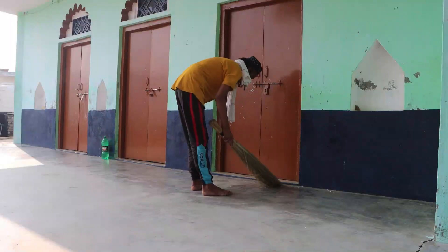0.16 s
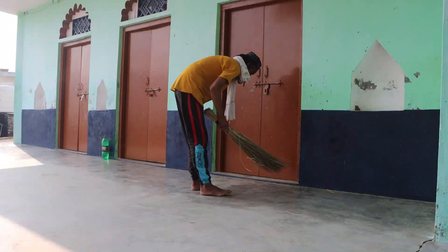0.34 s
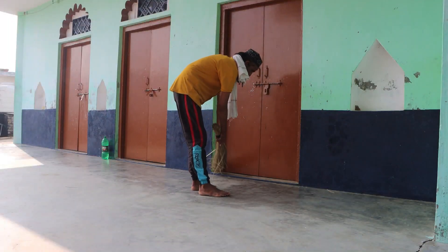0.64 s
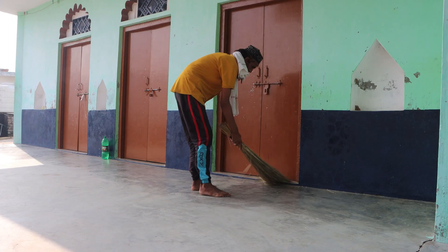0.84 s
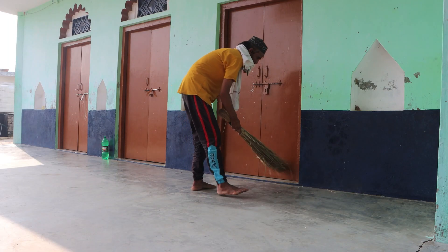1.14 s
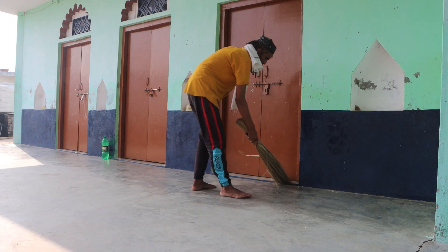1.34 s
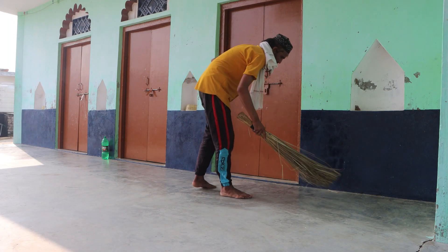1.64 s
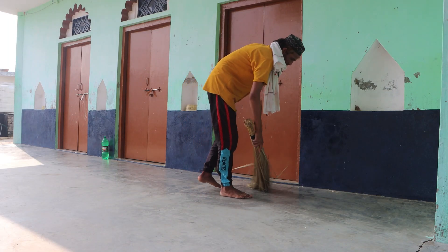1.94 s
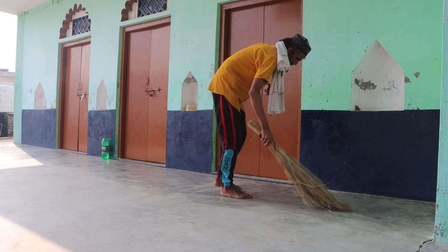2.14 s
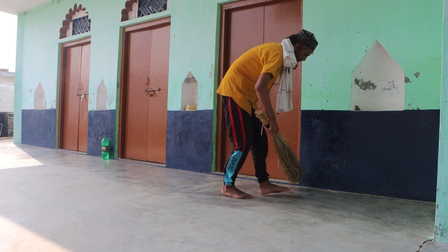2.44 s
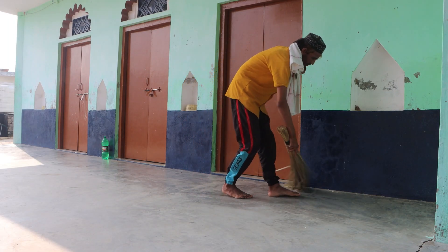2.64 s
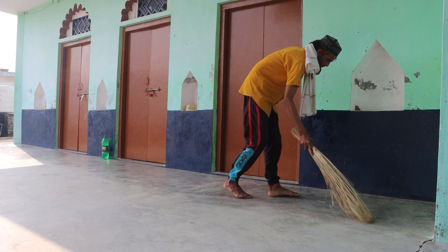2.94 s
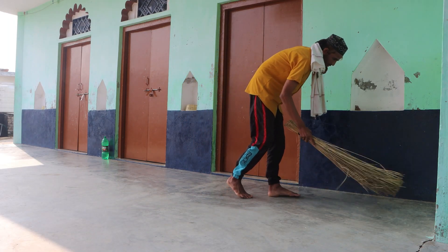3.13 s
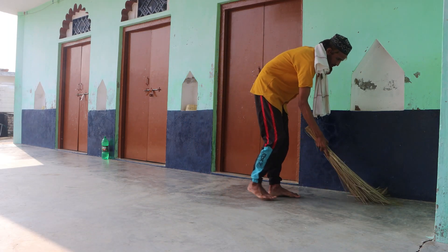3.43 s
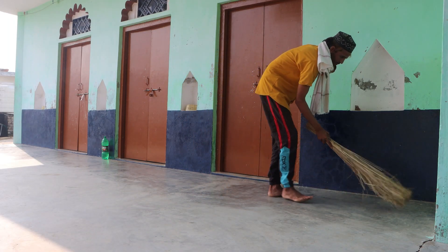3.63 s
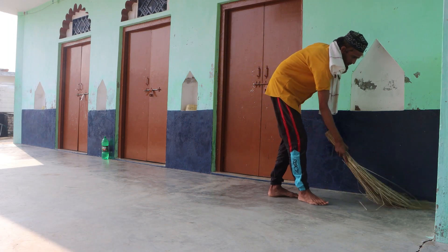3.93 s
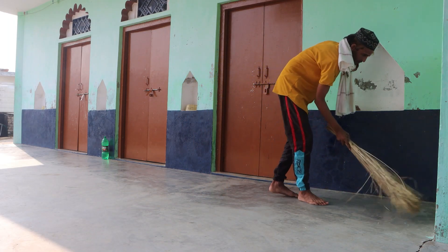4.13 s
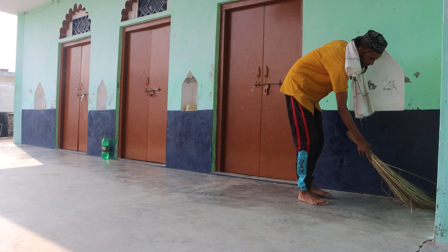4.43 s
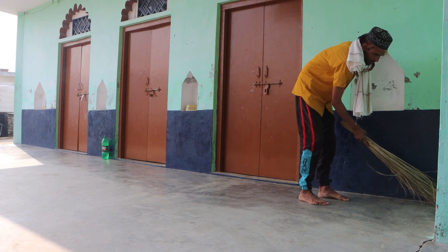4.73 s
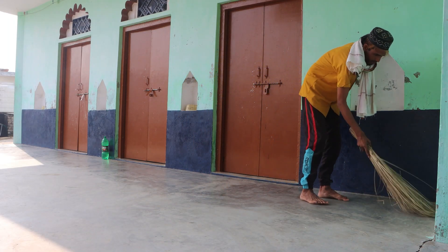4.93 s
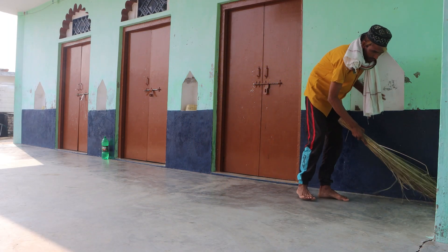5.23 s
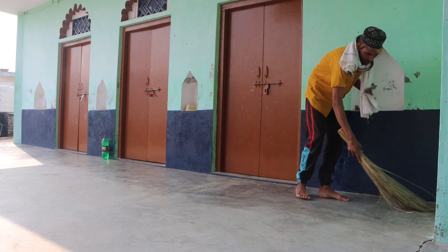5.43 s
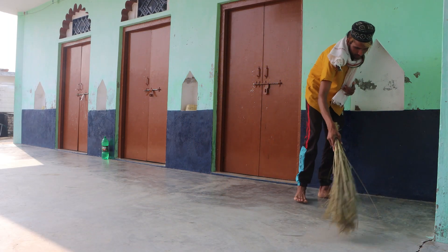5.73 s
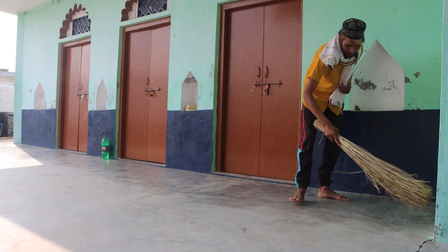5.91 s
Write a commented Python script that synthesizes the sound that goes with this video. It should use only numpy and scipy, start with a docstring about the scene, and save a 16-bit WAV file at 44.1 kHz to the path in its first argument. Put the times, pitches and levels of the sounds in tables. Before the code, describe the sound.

Outdoors under a roof, dry stalks swish rhythmically over hard floor, roughly every half to three-quarters of a second. Forward strokes are sharp, crackly and high; return drags are light and quiet. Isolated clicks spring from bent stalks, with a brief rough chatter or two. Faint barefoot puffs come early on. Low traffic noise and a wavering far engine, slowly drawing nearer, lie underneath. Single camera microphone, same in both channels.

```python
"""Distant traffic and a far engine, filtered noise and two wavering tones, drone under the whole scene.
A long straw broom sweeps a smooth concrete veranda in ten brisk strokes, dragging lightly on the way back:
random slips of thousands of stalk tips ring the straw and scrape grit, and wall and roof answer briefly.
Bare feet pad along as dull noise puffs; throughout, stray stalks flick as short resonances. A few chatter
as rough tones, and later strokes begin with the bundle slapping down. One microphone."""
import sys
import numpy as np
from scipy import signal
from scipy.fft import rfft, irfft, next_fast_len
from scipy.io import wavfile
from scipy.ndimage import map_coordinates

SR = 44100
rng = np.random.default_rng(int(sys.argv[2]) if len(sys.argv) > 2 else 0)


def digitize_waveform(pressure):
    """Quantize a signal to 16-bit integers and store it at the path in sys.argv[1].

    Rows of a 2-D input are taken as channels; values are limited to [-1, 1].
    """
    field = np.atleast_2d(pressure).T
    bounded = np.clip(field, -1, 1)
    quanta = np.round(bounded * 32767).astype(np.int16)
    wavfile.write(sys.argv[1], SR, quanta)


N = 267673  # samples


def amp(db):
    """Decibels to gain."""
    return 10 ** (np.asarray(db) / 20)


def unit(x):
    """Scale to rms 1."""
    return x / np.sqrt(np.mean(x ** 2) + 1e-20)


def along(points, hz):
    """Read (Hz, value) points on a log frequency axis."""
    f, v = np.transpose(points)
    return np.interp(np.log(hz + 1), np.log(f + 1), v)


def curves(rows):
    """One value per sample for each column after the time."""
    s, *cols = np.transpose(rows)
    return [np.interp(np.arange(N) / SR, s, c) for c in cols]


def wobble(rate):
    """A smooth random curve with rate knots a second."""
    knots = rng.standard_normal(int(N * rate / SR) + 4)
    return map_coordinates(knots, [np.arange(N) * rate / SR])


def colour(x, spectrum, size=2048):
    """Minimum-phase filter with the given spectrum, so that clicks keep sharp fronts; rms 1."""
    gain = amp(along(spectrum, np.fft.rfftfreq(size, 1 / SR)))
    cepstrum = irfft(np.log(gain))
    # fold the cepstrum forwards in time: the filter becomes causal
    cepstrum[1:size // 2] *= 2
    cepstrum[size // 2 + 1:] = 0
    response = irfft(np.exp(rfft(cepstrum)))
    return unit(signal.fftconvolve(x, response)[:N])


def noise(spectrum):
    """Steady noise with the given spectrum; rms 1."""
    m = next_fast_len(N)
    gain = amp(along(spectrum, np.fft.rfftfreq(m, 1 / SR)))
    return unit(irfft(rfft(rng.standard_normal(m)) * gain, m)[:N])


def resonate(x, hz, q):
    """One resonance."""
    return signal.lfilter(*signal.iirpeak(hz, max(q, .5), SR), x)


def add(track, s, sound):
    """Mix a sound into a track at time s in seconds."""
    part = track[max(round(s * SR), 0):][:len(sound)]
    part += sound[:len(part)]


def burst(length, db, grain):
    """A grainy sound swells to level db over a quarter of length in seconds, then fades more slowly."""
    u = 4 * np.arange(len(grain)) / SR / length
    swell = u * np.exp(1 - u)
    grain_rms = np.sqrt(np.average(grain ** 2, weights=swell ** 2))
    return amp(db) * grain * swell / grain_rms


# Distant traffic. Each row: time in seconds, rumble level in dB.
TRAFFIC_LEVEL = [(0, -39), (.6, -34.5), (1.1, -39.5), (1.4, -35.5), (2.3, -40), (3.4, -36.5), (3.7, -44.5),
                 (4, -40.5), (5.2, -37), (5.95, -32.5)]
# Colour of the rumble. Each row: frequency in Hz, relative level per Hz in dB.
RUMBLE_COLOUR = [(15, -13), (30, -7), (39, -2.5), (46, 2.5), (54, -2), (70, -11.5), (100, -14.5),
                 (160, -21), (400, -42)]
# The low and the high tone of a far engine, in Hz.
ENGINE_TONES = [174, 355]
# The engine draws nearer. Each row: time in seconds, low tone in dB, high tone in dB, before the waver.
ENGINE_LEVELS = [(0, -73, -61), (2.7, -63.5, -57), (4.1, -55, -54), (4.7, -54.5, -72), (6.07, -50, -54)]
# Colour of the open air. Each row: frequency in Hz, relative level per Hz in dB.
AIR_COLOUR = [(40, -4), (110, -3), (190, 2.5), (300, -5), (600, -2), (1000, -9), (2000, -7.5), (8000, -34),
              (15000, -35)]
AIR_DB, AIR_SWING_DB = -44.5, 1.2  # middle level; scale of its random swing


def outdoors():
    """Traffic rumble and open air are coloured noise; a far engine is two tones that waver together in pitch."""
    rumble_db, = curves(TRAFFIC_LEVEL)
    rumble = amp(rumble_db) * noise(RUMBLE_COLOUR)
    turning = np.cumsum(1 + 0.0079 * wobble(3)) / SR
    engine = np.zeros(N)
    for hz, db in zip(ENGINE_TONES, curves(ENGINE_LEVELS)):
        level = amp(db + 1.14 * wobble(6.1))
        engine += level * np.sqrt(2) * np.sin(2 * np.pi * hz * turning)
    air = amp(AIR_DB + AIR_SWING_DB * wobble(4.05)) * noise(AIR_COLOUR)
    return rumble + engine + air


def slips(rate, spread_db, smooth):
    """Random tiny slips of uneven size, rate a second, over smooth sliding friction."""
    sizes = np.minimum(rng.standard_normal(N), 2.5)
    signs = np.sign(rng.standard_normal(N))
    kicks = (rng.random(N) < rate / SR) * signs * amp(spread_db * sizes)
    return unit(kicks) + smooth * rng.standard_normal(N)


def straw_ring(x, hz, q, count=5):
    """A gliding straw resonance, cross-faded between fixed ones."""
    steps = np.linspace(hz.min(), hz.max(), count)
    ring = np.zeros(N)
    for step, share in zip(steps, np.eye(count)):
        ring += np.interp(hz, steps, share) * resonate(x, step, q)
    return ring


# Colours of the straw, thick stems, fine tips, floor scrape and rasping stalk points.
# In all five, each row: frequency in Hz, relative level per Hz in dB.
STRAW_COLOUR = [(2000, -17), (5500, -18.5), (7000, 0.5), (10000, 0.5), (12000, -13.5), (15500, -19)]
STEM_COLOUR = [(2500, -39.5), (4300, -10.5), (5400, -3.5), (6500, 0), (7500, -3), (9500, -25), (15000, -50)]
TIP_COLOUR = [(6000, -28.5), (9500, -8), (10800, -2.5), (12500, -3), (13400, -6.5), (14400, -10),
              (15100, -16), (15800, -5.5)]
SCRAPE_COLOUR = [(90, -35), (220, -7.5), (520, -3), (800, -2), (1200, -1.5), (1700, 3), (2300, -0.5),
                 (3000, -5.5), (4500, -21), (15000, -39)]
POINT_COLOUR = [(1500, -21), (2400, -4), (2900, -1.5), (3800, -0.5), (4600, -4), (6000, -7.5), (15000, -40)]


def broom():
    """Stalk tips catch and slip in clumps; the slips ring straw, stems and tips, and grind on the floor."""
    rub_db, scrape_db, rasp_db, stem_db, tip_db, pitch = contact()
    # a louder rub is a faster stroke: more slips a second
    rate = 9000 * amp(.6 * (rub_db + 18.5))
    # neighbouring stalks let go together
    clumps = unit(amp(0.64 * wobble(520) + 0.99 * wobble(80)))

    def catch(share=1):
        """Clumped slips at a share of the stalk rate."""
        return slips(share * rate, spread_db=3, smooth=0.54) * clumps

    straw = colour(straw_ring(catch(), pitch, q=4.94), STRAW_COLOUR)
    stems = colour(catch(), STEM_COLOUR)
    tips = colour(catch(), TIP_COLOUR)
    # grains of grit are fewer than stalks
    scrape = colour(catch(.45), SCRAPE_COLOUR)
    rasp = colour(catch(.45), POINT_COLOUR)
    grit = scrape + amp(rasp_db + 1) * rasp
    stalks = amp(-0.6) * straw + amp(stem_db) * stems + amp(tip_db + 1.5) * tips
    return amp(rub_db) * (stalks + amp(scrape_db - 0.32) * grit)


# Trailing stalks never quite leave the floor. The one row: rub in dB, scrape against rub in dB,
# rasp against scrape in dB, stems against rub in dB, tips against rub in dB, straw pitch in Hz.
TRAILING_STALKS = (-34, -6, -1.5, -5, -2.5, 8400)


def contact():
    """Rub, scrape, rasp, stems, tips and pitch over time: contacts add in power, the strongest rules the colour."""
    t = np.arange(N) / SR
    trailing = (TRAILING_STALKS[0], TRAILING_STALKS[1:])
    power, blend = 0, 0
    for db, tone in [*strokes(t), *drags(t), trailing]:
        weight = amp(np.maximum(db, -120)) ** 2
        power = power + weight
        blend = blend + weight * np.reshape(tone, (len(tone), -1))
    scrape_db, rasp_db, stem_db, tip_db, pitch = blend / power
    more_rub, more_scrape, more_stems, more_tips = pushes(t)
    rub_db = 10 * np.log10(power) + more_rub
    return rub_db, scrape_db + more_scrape, rasp_db, stem_db + more_stems, tip_db + more_tips, pitch


# Decay of the veranda's answer. Each row: frequency in Hz, time to fall by 60 dB in seconds.
VERANDA_DECAY = [(200, 0.64), (2000, 0.51), (8000, 0.7), (15000, 0.59)]


def veranda(x, count=48):
    """Wall, floor and roof return a short noise tail, cross-faded to a new one as the broom moves about."""
    out, places = np.zeros(N), np.linspace(0, N, count)
    for share in np.eye(count):
        hz, t, z = signal.stft(rng.standard_normal(SR // 2), SR, nperseg=256)
        decay = amp(-60 * t / along(VERANDA_DECAY, hz)[:, None])
        tail = signal.istft(z * decay, SR, nperseg=256)[1]
        here = np.sqrt(np.interp(np.arange(N), places, share))
        echo = signal.fftconvolve((x * here)[here > 0], tail / np.linalg.norm(tail))
        add(out, np.argmax(here > 0) / SR + .005, echo)  # 5 ms late
    return out


# Forward strokes. Each row: start in seconds, attack in seconds, hold in seconds, fade in seconds, rub in dB,
# loss over the fade in dB, tips' gain over the stroke in dB, pitch glide over the stroke in Hz,
# floor scrape against rub in dB, rasp against scrape in dB, thick stems against rub in dB,
# fine tips against rub in dB, straw pitch in Hz. The roll below shifts the last five.
FORWARD_STROKES = [(0.021, 0.056, 0.063, 0.26, -18.5, 8, -10, -500, -14, -1, -1.5, -4, 8400),
                   (0.824, 0.08, 0.15, 0.076, -18.5, 7, -12, 0, -13, -2, -2.5, -3.5, 8200),
                   (1.449, 0.095, .015, .15, -15.5, 10, 2, 200, -12.5, -3, -7, -6.5, 8450),
                   (2.039, 0.067, .06, 0.21, -17, 8, 1, -2, -16, 1.5, -14, -4, 9000),
                   (2.706, 0.086, .1, 0.24, -16, 9, -2, 300, -16, 1, -11.5, -5.5, 8830),
                   (3.372, 0.042, 0.1, 0.3, -15.5, 8.5, 0, -300, -14.5, -3, -10.5, -9, 8560),
                   (3.921, 0.035, 0.094, 0.19, -18, 8, 6, 600, -14, -1, -10.5, -7.5, 8860),
                   (4.46, 0.025, .11, 0.15, -17, 5.5, 0, 202, -16, 0.5, -13.5, -5, 8900),
                   (4.896, 0.048, 0.12, 0.13, -17.5, 6, 6, 400, -15.5, 1, -11, -7, 8700),
                   (5.399, 0.032, 0.23, 0.16, -22, 3.5, 3, 600, -13.5, -2.5, -6, -4, 8300)]
# Through a stroke the bundle rolls from lying flat up onto its points. Each row: share of the stroke from 0 to 1,
# then the shifts of scrape in dB, rasp in dB, stems in dB, tips in dB and straw pitch in Hz.
BUNDLE_ROLL = [(0, 5, -2, 4, 1.5, -350), (.25, 0.5, 0, 1, -0.5, -150), (.55, -1.5, 1, -2.5, 0.5, 150),
               (1, 4.5, 1.5, -0.5, 2.5, 200)]
TOUCH_DB, LIFT_DB_PER_S = -13, 170  # first touch against full rub; fall as the broom lifts


def strokes(t):
    """Each stroke bites, holds, fades and lifts, while the roll of the bundle shifts its colour."""
    share, *shifts = np.transpose(BUNDLE_ROLL)
    for s, attack, hold, fade, db, loss_db, tip_gain_db, glide_hz, *tone in FORWARD_STROKES:
        length = attack + hold + fade
        bite = TOUCH_DB * np.maximum(1 - (t - s) / attack, 0)
        ease = loss_db * np.clip((t - s - attack - hold) / fade, 0, 1)
        lift = LIFT_DB_PER_S * np.maximum(t - s - length, 0)
        done = np.clip((t - s) / length, 0, 1)
        rolled = [own + np.interp(done, share, shift) for own, shift in zip(tone, shifts)]
        scrape, rasp, stems, tips, pitch = rolled
        tips = tips + tip_gain_db * (done - .5)
        pitch = pitch + glide_hz * (done - .5)
        yield db + bite - ease - lift, [scrape, rasp, stems, tips, pitch]


# Soft blows of bare feet. Each row: start in seconds, relative level in dB, pitch in Hz, length in seconds.
FOOT_PADS = [(.1, -35, 210, .097), (0.447, -38, 295, 0.087), (1.324, -34, 250, .13), (1.353, -33, 42, 0.14),
             (1.743, -32.5, 324, 0.073), (1.849, -35, 280, .15), (2.743, -25, 48, 0.057)]


def pads():
    """Bare soles give a dull puff: noise through two broad resonances, with no ring."""
    out = np.zeros(N)
    for s, db, hz, length in FOOT_PADS:
        puff = resonate(resonate(rng.standard_normal(SR // 2), hz, q=1.7), hz, q=1.7)
        add(out, s, burst(length, db - 3.5, puff))
    return out


# The wrist bears down or eases off. Each row: middle in seconds, length in seconds, extra rub in dB,
# extra floor scrape in dB, extra stems in dB, extra tips in dB.
WRIST_PUSHES = [(0.135, .06, 0.6, 0, -1, 4), (.265, 0.063, 3, 0, -1.5, -1), (1.05, 0.036, 2, -1, -8, -5),
                (2.329, .07, 1.5, 5.5, 7, 0), (3.108, .04, 3, 0.5, 1, 2), (3.471, 0.024, .5, 2, 0.5, 2),
                (3.598, 0.087, .7, .5, 2, .5), (4.072, 0.053, 4, -1.5, -5, 2.5),
                (4.132, 0.043, 0, -6, -4, 0), (4.581, 0.022, 1.5, 1, -2, 4), (5.05, 0.055, 1, -1, -5, 3),
                (5.615, 0.044, 1.5, -2, 2, 2), (5.67, .03, 3.5, -6, -2, 0), (5.764, 0.037, 2.5, 0, 0, 0)]


def pushes(t):
    """Each push or easing of the wrist is a smooth swell or dip in rub, scrape, stems and tips."""
    s, length, *extra_db = np.transpose(WRIST_PUSHES)
    distance = 2 * np.abs(t - s[:, None]) / length[:, None]
    swell = np.exp(-np.minimum(distance, 10) ** 2 / 2)
    return np.array(extra_db) @ swell


# Light drags on the way back. Each row: start in seconds, length in seconds, rub in dB,
# floor scrape against rub in dB, thick stems against rub in dB, fine tips against rub in dB, straw pitch in Hz.
RETURN_DRAGS = [(.425, .1, -28, -10.5, -9.5, -8.5, 8300), (0.617, .07, -29, -11.5, -1, -5, 8200),
                (1.307, .17, -27, -6.5, -3, -4.5, 8140), (1.73, 0.16, -30, -7.5, -16, -3, 9050),
                (1.95, .08, -25, -12, -9, -9.5, 8750), (2.485, 0.16, -27.5, -7.5, -5.5, -0.5, 8800),
                (3.208, 0.18, -28, -11, -11.5, -5.5, 8840), (4.391, .06, -30, -9.5, -8, -3, 8600),
                (4.865, .04, -29, -14, -10, -8, 8450), (5.323, 0.063, -25.5, -15, -10.5, -9, 8400),
                (5.855, 0.18, -32.5, -10, -10, -7, 8500)]
DRAG_EDGE_S = 0.065  # a drag falls by 10 dB over this time at either end
DRAG_RASP_DB = -2  # rasp against scrape


def drags(t):
    """On the way back the broom slides lightly and evenly."""
    for s, length, db, scrape_db, stem_db, tip_db, hz in RETURN_DRAGS:
        outside = np.maximum(np.abs(t - s - length / 2) - length / 2, 0)
        yield db - 10 * outside / DRAG_EDGE_S, [scrape_db, DRAG_RASP_DB, stem_db, tip_db, hz]


# Single stalks flicking free. Each row: start in seconds, relative level in dB.
STALK_FLICKS = [(.525, -25), (.711, -20.5), (.795, -18), (.808, -23), (1.027, -11), (1.841, -24),
                (1.98, -19), (2.123, -13), (2.173, -20), (2.748, -21), (2.926, -14), (3.585, -13),
                (3.851, -16), (4.096, -20), (4.586, -14), (4.723, -16), (4.828, -19), (4.834, -19),
                (5.142, -15)]


def flicks():
    """A bent stalk springs back: a sharp crack with a short bright ring."""
    out, t = np.zeros(N), np.arange(SR // 20) / SR
    for s, db in STALK_FLICKS:
        fade = amp(-60 * t / 0.021) + 0.13 * amp(-60 * t / .04)
        crack = np.sign(rng.standard_normal(len(t))) * fade
        hz = 8400 * np.exp(0.028 * rng.standard_normal())
        tick = resonate(crack, hz, q=2.9) + 0.12 * crack
        add(out, s, amp(db + 8) * tick)
    return out


# A stalk chattering on the concrete. Each row: start in seconds, relative level in dB, pitch in Hz,
# length in seconds.
STALK_CHATTER = [(1.3408, -10, 5230, 0.0068), (1.343, -13.5, 4300, .0055), (4.489, -17, 1765, 0.01)]


def squeaks():
    """For a few milliseconds the slips fall into step: a sine with jittered phase gives a rough pitch."""
    out, t = np.zeros(N), np.arange(SR // 20) / SR
    for s, db, hz, length in STALK_CHATTER:
        phase = 2 * np.pi * hz * np.cumsum(1 + .25 * rng.standard_normal(len(t))) / SR
        swell = np.exp(-(2 * t / length - 1) ** 2 * 2)
        soft_start = np.tanh(t * hz)
        add(out, s, amp(db) * np.sin(phase) * swell * soft_start)
    return out


# The bundle slapping down as a stroke begins. Each row: start in seconds, relative straw level in dB,
# relative thump level in dB, thump pitch in Hz, thump length in seconds.
BUNDLE_LANDINGS = [(1.536, -31, -30, 1300, 0.054), (2.748, -28, -33, 700, 0.029),
                   (3.389, -25, -26, 603, 0.071), (3.949, -31, -31.5, 620, 0.13),
                   (4.471, -23, -24, 1270, 0.15), (4.924, -21.5, -33.5, 915, 0.092),
                   (5.427, -28, -30, 604, 0.071)]


def landings():
    """Many stalks hit at once: a bright splash of straw over the dull thump of the bundle."""
    out = np.zeros(N)
    for s, straw_db, thump_db, hz, length in BUNDLE_LANDINGS:
        splash, thump = rng.standard_normal((2, SR // 2))
        splash = resonate(resonate(splash, 8800, q=1.8), 8800, q=1.8)
        thump = resonate(resonate(thump, hz, q=0.71), hz, q=0.71)
        add(out, s, burst(0.019, straw_db + 3, splash))
        add(out, s, burst(length, thump_db - 2, thump))
    return out


def scene():
    """The sweeper under the veranda roof, the same in both channels."""
    near = broom() + landings() + flicks() + squeaks() + pads()
    mono = amp(-0.22) * near + amp(-13) * veranda(near) + outdoors()
    return np.array([mono, mono])


TOP_HZ = 15750  # nothing passes from here up


def record(dry):
    """The camera microphone rounds off the tallest peaks, and its treble rolls off towards its band limit."""
    m = next_fast_len(N + SR // 2)
    hz = np.fft.rfftfreq(m, 1 / SR)
    rounded = dry / (1 + dry ** 6) ** (1 / 6)
    response = (hz < TOP_HZ) / np.sqrt(1 + (hz / 14700) ** 36)
    return irfft(rfft(rounded, m) * response, m)[..., :N]


dry = scene()
out = record(dry)
digitize_waveform(out)
```